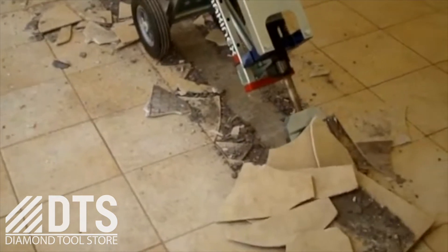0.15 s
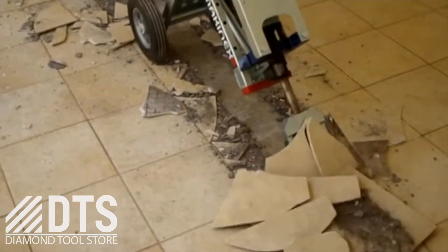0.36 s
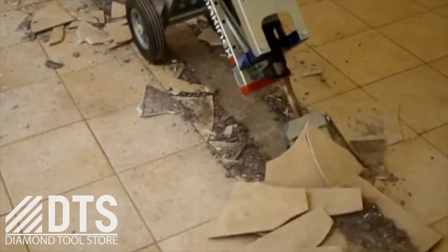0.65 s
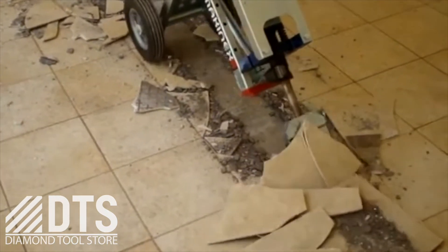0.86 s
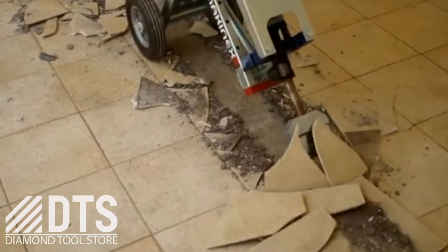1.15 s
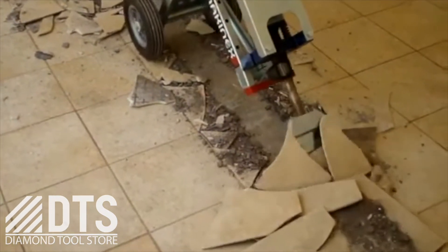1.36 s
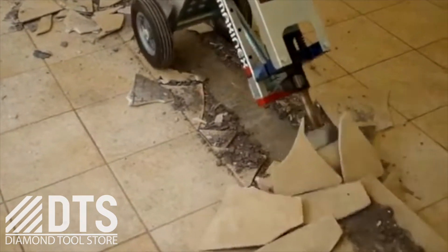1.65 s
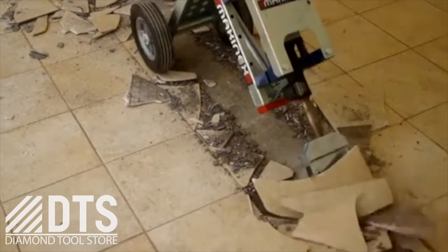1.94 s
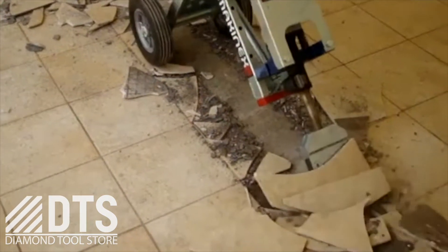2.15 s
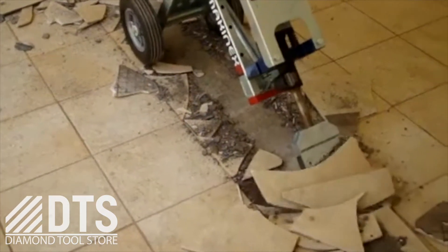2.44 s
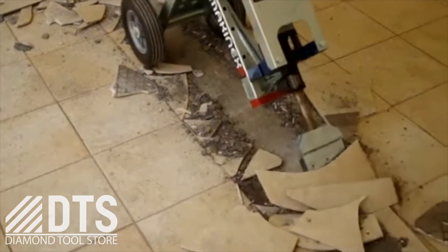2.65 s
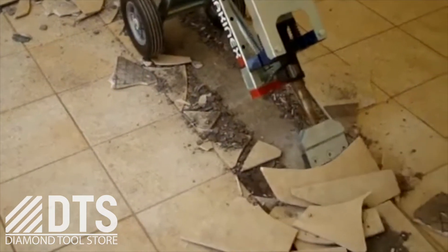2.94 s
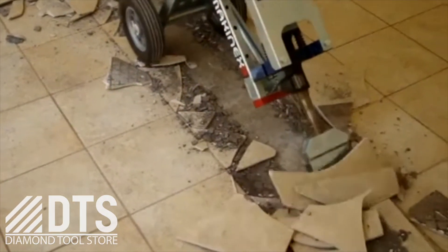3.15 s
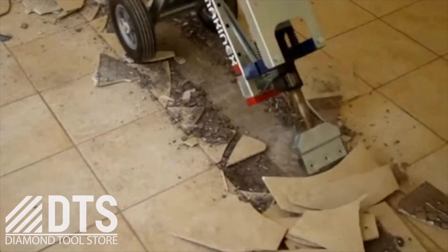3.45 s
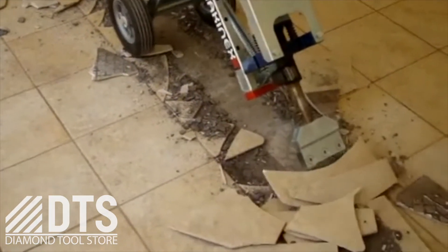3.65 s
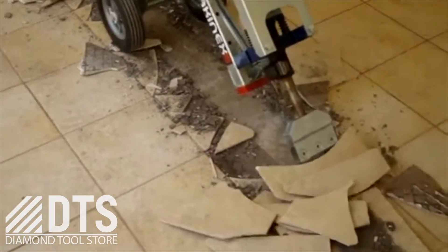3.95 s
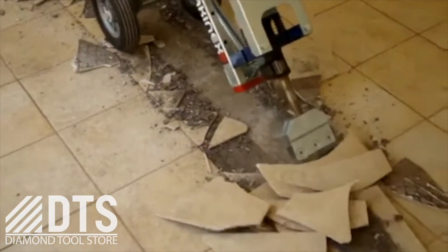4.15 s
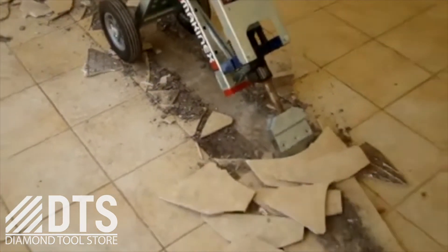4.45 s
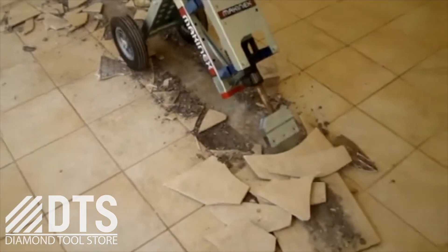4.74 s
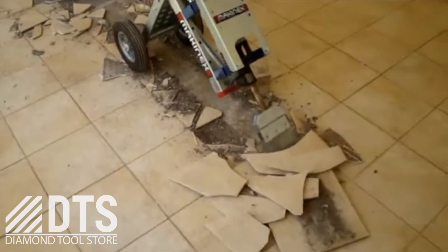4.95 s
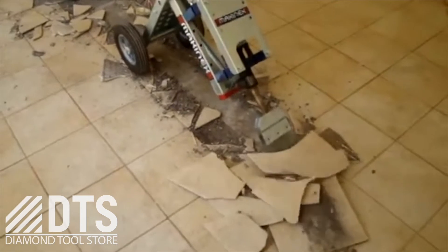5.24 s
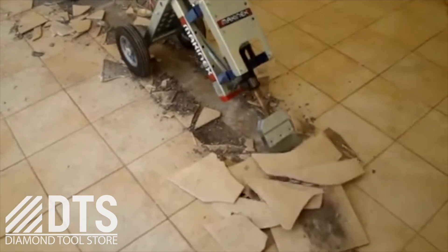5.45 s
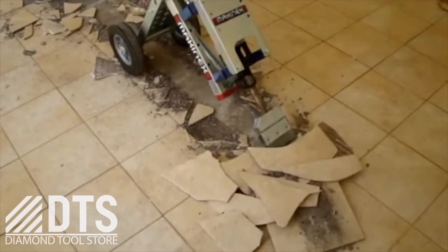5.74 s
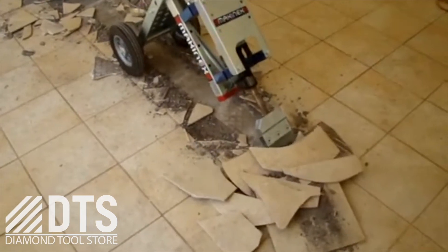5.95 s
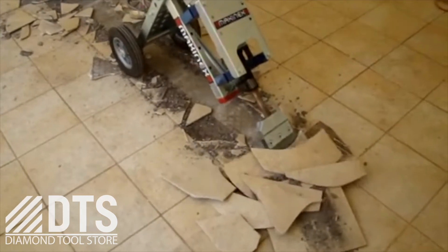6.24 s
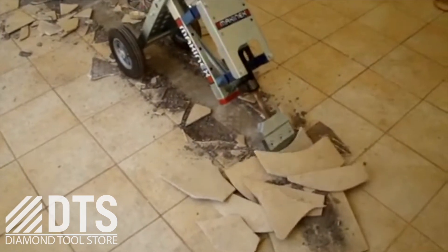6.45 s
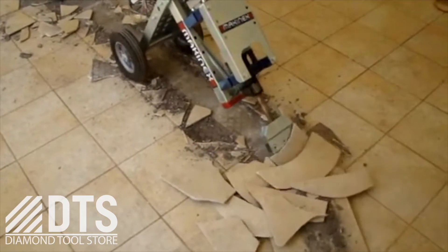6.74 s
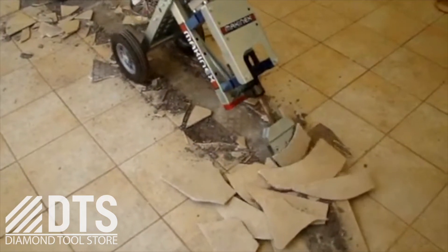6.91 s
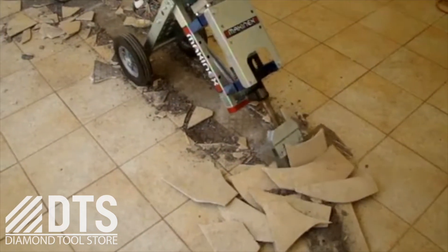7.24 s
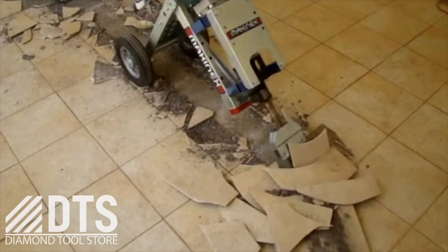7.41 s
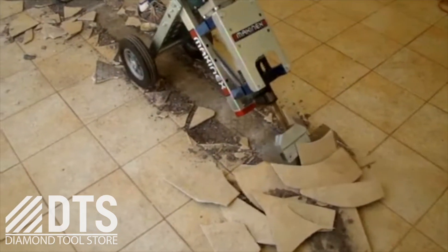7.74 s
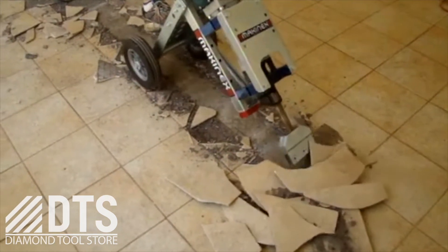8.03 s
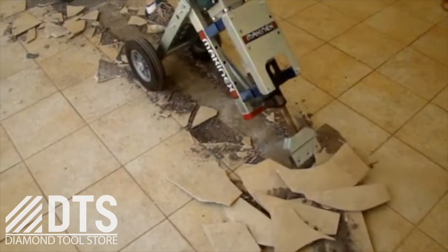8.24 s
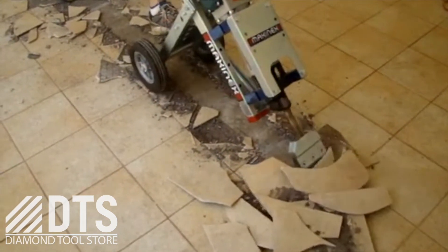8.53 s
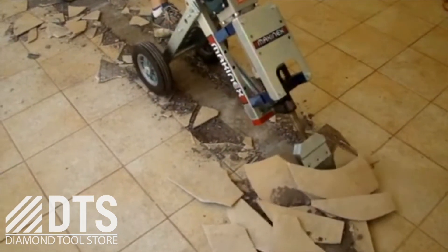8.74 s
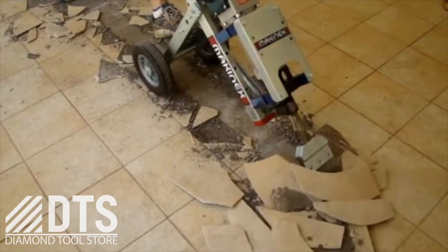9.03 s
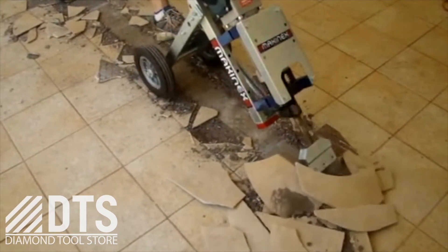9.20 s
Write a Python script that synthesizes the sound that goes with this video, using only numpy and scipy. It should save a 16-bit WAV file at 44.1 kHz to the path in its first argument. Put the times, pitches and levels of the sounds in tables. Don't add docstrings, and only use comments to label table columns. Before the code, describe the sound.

From 0 s an electric demolition hammer is already pounding at full speed, about 24 even blows a second, a harsh fluttering buzz that continues to the cut at about 9.4 s. Broken ceramic tiles clatter densely over it, with hissing grit and ringing steel. The blade skids near 0.8 s, then bites again; the rate sags slightly until 1.4 s. From 1.4 to 2.8 s pings and hollow tile rings crowd together, the hiss duller from about 2.2 s. Around 3 s the contact slackens briefly, then a hard push strengthens the hum from 3.3 to 3.9 s. At about 4.5 s the listening position steps back and the room hum changes colour. A strong bite comes near 4.8 s, sharp shard clacks scatter between 6.4 and 8.6 s, and skids and bites alternate near 9 s. The room is bare and echoing, the close microphone thin in bass, with faint handling rumbles.

```python
import sys
import numpy as np
from scipy import signal
from scipy.fft import rfft, irfft, next_fast_len
from scipy.io import wavfile
from scipy.ndimage import uniform_filter1d, map_coordinates

SR = 44100
rng = np.random.default_rng(int(sys.argv[2]) if len(sys.argv) > 2 else 0)


def amplitude_ratio(level_db):
    exponent = np.asarray(level_db, float) / 20
    return 10 ** exponent


def master_out(mix):
    frames = np.transpose(np.atleast_2d(mix))
    ceiling = np.clip(frames, -1, 1)
    pcm = np.round(ceiling * 32767).astype(np.int16)
    wavfile.write(sys.argv[1], SR, pcm)


N = 413216
TIME = np.arange(N) / SR


def unit(x):
    return x / np.sqrt(np.mean(x ** 2))


def colour(x, points):
    size = next_fast_len(len(x) + SR // 4)
    hz, db = np.transpose(points)
    bins_hz = np.arange(size // 2 + 1) * SR / size
    gain = amplitude_ratio(np.interp(np.log(bins_hz + 1), np.log(hz), db))
    return irfft(rfft(x, size) * gain, size)[:len(x)]


def highpass(x, hz):
    return signal.sosfilt(signal.butter(4, hz, "high", fs=SR, output="sos"), x)


def ring(x, modes):
    x = unit(x)
    out = x.copy()
    for hz, width, db in modes:
        out += amplitude_ratio(db) * unit(signal.lfilter(*signal.iirpeak(hz, hz / width, SR), x))
    return unit(out)


def walk(rate):
    k = int(SR / rate)
    held = np.repeat(rng.standard_normal(N // k + 1), k)
    return 1.14 * uniform_filter1d(uniform_filter1d(held, k), k)[:N]


def swell(s, rise_s, hold_s, fall_s):
    return np.clip(np.minimum((TIME - s) / rise_s + 1, 1 - (TIME - s - hold_s) / fall_s), 0, 1)


def diffuse(x, t60_s, wet_db):
    keep = amplitude_ratio(-120 / (t60_s * SR))
    power = signal.lfilter([1 - keep], [1, -keep], x ** 2, zi=[np.mean(x ** 2)])[0]
    return unit(x + amplitude_ratio(wet_db) * np.sqrt(power) * rng.standard_normal(N))


# time of the fullest skid in seconds, length in seconds, drive change in dB,
# change of contact with the slab in dB.
SKIDS = [(0.83, 0.21, 0.5, -8), (1.66, 0.17, -1, 0.5), (2.3, 0.14, 1, 3), (2.977, 0.2, -4, -8),
         (2.847, .2, 1.5, -6), (3.132, 0.2, 1, -4), (4.286, 0.16, -1.5, 0), (6.155, 0.073, -2.5, -3),
         (7.167, 0.085, -1.5, 1), (8.26, 0.23, -3, -2.5), (8.885, 0.054, -2.5, -3)]


def skids():
    drive = sum(db * swell(s, length / 2, 0, length / 2) for s, length, db, _ in SKIDS)
    recontact_s = .03
    lifted = sum(db * swell(s, length / 2, length / 3, recontact_s) for s, length, _, db in SKIDS)
    return drive, lifted


# time in seconds, gain in dB, hold in seconds.
BITES = [(0.08, 8.5, 0.054), (0.944, 6.5, 0.14), (1.796, 3.5, 0.25), (2.16, 7.5, 0.27), (3.242, 6, 0.45),
         (3.95, -2, .08), (4.404, 4, .03), (4.82, 8, 0.12), (6.35, 0.5, .15), (6.995, 4.5, 0.064),
         (7.65, 2.5, 0.18), (8.773, 4, .04), (8.966, 7, 0.044), (9.22, 4, .08)]


def bites():
    return np.max([db * swell(s, 0.11, hold, 0.21) for s, db, hold in BITES], axis=0)


# start in seconds, length in seconds, slab hum in dB.
PUSHES = [
    (-.2, 0.91, -73),
    (0.967, 0.34, -67),
    (1.42, .18, -82),
    (1.79, 1.1, -69.5),
    (3.07, 0.19, -76),
    (3.287, 0.64, -65.5),
    (4.02, .18, -79),
    (4.35, 0.97, -73),
    (5.505, 2.8, -71),
    (8.302, 1.3, -71),
]


def pushes():
    eased_db, lean_s, ease_s = -82, 0.034, 0.16
    return eased_db + np.max([(db - eased_db) * swell(s, lean_s, length, ease_s)
                              for s, length, db in PUSHES], axis=0)


# time in seconds, rattle in dB, large pieces over small ones in dB,
# grit thrown up in dB.
HEAP = [(0.0, -24, -6.5, -0.5), (0.21, -20.5, -7, -0.5), (1.04, -22.5, -7, -1), (1.51, -19.5, -8, 0),
        (1.85, -21.5, -7.5, -0.5), (2.14, -20, -7, -1.5), (3.08, -22.5, -6.5, -0.5),
        (3.31, -21.5, -9.5, -1), (3.39, -22, -5, -0.5), (4.28, -20.5, -10.5, -0.5), (4.7, -22.5, -9, 0),
        (5.19, -20, -9.5, -0.5), (6.08, -25, -8.5, 0), (6.78, -22.5, -10.5, 0), (8.87, -24, -9.5, 0),
        (9.0, -22.5, -10, 0), (9.32, -23, -7, 0), (9.37, -26, -9, -3)]
FLICKER_DB = 1.0, 0.3, 0.4, 0.2


def effort():
    skid, lifted = skids()
    bite, grip = bites(), pushes()
    s, rattle_db, size_db, dust_db = np.transpose(HEAP)
    rattle = np.interp(TIME, s, rattle_db) + 0.41 * skid
    size = np.interp(TIME, s, size_db)
    big = -1 + rattle + 0.15 * lifted + size + 0.11 * bite
    middle = -5.5 + rattle - 0.15 * size
    small = -9 + rattle - 0.51 * size
    grit = -23.5 + 0.12 * (rattle - np.mean(rattle)) + skid + np.interp(TIME, s, dust_db)
    layers = [db + spread * walk(14) for db, spread in zip((big, middle, small, grit), FLICKER_DB)]
    contact = -44 + bite + lifted + 0.54 * walk(16)
    hum = grip + 0.55 * lifted + .7 * walk(7.5)
    return amplitude_ratio(np.array(layers + [contact, hum]))


def handling():
    rumble = colour(rng.standard_normal(N), [(12, -14.0), (25, -5.5), (100, -6), (160, -24), (400, -66)])
    return amplitude_ratio(-78 + 2.2 * walk(8)) * unit(rumble)


# time in seconds, level in dB.
JOLTS = [(.15, -63), (.7, -69), (.8, -64), (1.59, -66), (2.04, -65), (2.32, -73), (2.71, -69), (3.05, -68),
         (3.4, -81), (4.15, -63), (4.93, -62), (5.95, -75), (7.3, -69), (8.17, -63)]


def jolts():
    shape = sum(amplitude_ratio(db) * swell(s, .02, .01, 0.072) for s, db in JOLTS)
    rumble = colour(rng.standard_normal(N), [(12, -10), (30, -7), (100, -1), (200, -3), (400, -61)])
    return shape * unit(rumble)


def echoes(pulses, t60_s, wet_db):
    length, at = SR // 3, np.flatnonzero(pulses)
    earlier = 7
    at = np.r_[at[0] - (at[1] - at[0]) * np.arange(earlier, 0, -1), at]
    fade = amplitude_ratio(-60 * np.arange(length) / SR / t60_s)
    likeness = .93
    out, tail = np.zeros(N + 2 * length), rng.standard_normal(length)
    for i in at:
        tail = likeness * tail + np.sqrt(1 - likeness ** 2) * rng.standard_normal(length)
        strength = pulses[i] if i >= at[earlier] else 1
        out[i + length:][:length] += strength * tail * fade
    return unit(pulses + amplitude_ratio(wet_db) * out[length:length + N] / np.linalg.norm(fade))


def chatter(turns, rate, spread_db, lag, settle, rest, rebound_db, t60_s, wet_db):
    first = np.exp(-((turns - lag) % 1) / settle)
    rebound = np.exp(-((turns - lag - .36) % 1) / settle)
    gate = rest + first + amplitude_ratio(rebound_db) * rebound
    hit = rng.random(N) < rate / SR
    size = amplitude_ratio(spread_db * np.minimum(rng.exponential(size=N), 4))
    return diffuse(gate * hit * rng.standard_normal(N) * size, t60_s, wet_db)


def blend(fresh, again, share):
    low = signal.butter(3, 2300, fs=SR, output="sos")
    return fresh + signal.sosfiltfilt(low, (np.sqrt(1 - share) - 1) * fresh + np.sqrt(share) * again)


def shifting(x, spread_db):
    f, frames, cells = signal.stft(x, SR, nperseg=512)
    where = np.meshgrid(f / 700, frames / .35, indexing="ij")
    patches = map_coordinates(rng.standard_normal((40, 40)), where, order=1)
    return signal.istft(cells * amplitude_ratio(spread_db * patches), SR, nperseg=512)[1][:N]


# frequency in Hz, width in Hz, level in dB.
STEEL = [(5136, 190, -16), (5440, 230, -26), (4690, 88, -22.5)]
# frequency in Hz, level in dB per Hz.
GRIT = [(2590, -43), (4400, -2.5), (5240, 0), (6230, -1.5), (7160, 0.5), (9490, -0.5), (10100, -3.5),
        (13100, -39), (22000, -120)]
# time in seconds, hold in seconds, share lost.
BURIED = [
    (.2, .25, 0.12),
    (2.245, 0.67, 0.28),
    (7.75, 0.35, 0.2),
]


def steel_and_grit(dust, level):
    hiss = shifting(colour(ring(dust, STEEL), GRIT), spread_db=-0.55)
    steel = amplitude_ratio(1.16 + 0.3 * walk(16)) * level * unit(hiss)
    cover = sum(lost * swell(s, 0.17, hold, 0.057) for s, hold, lost in BURIED)
    return steel - cover * colour(steel, [(6000, -39), (7000, -8), (7800, -4.5), (20000, -13)])


def singing(knocks, table, cycles, overhang):
    out = np.zeros(N)
    for s, length, hz, db in table:
        here = slice(max(int((s - overhang) * SR), 0), min(int((s + length + overhang) * SR), N))
        mode = signal.iirpeak(hz, cycles, SR)
        tone = unit(signal.lfilter(*mode, signal.lfilter(*mode, knocks[here])))
        out[here] += amplitude_ratio(db) * tone * np.sqrt(np.hanning(len(tone)))
    return out


# start in seconds, length in seconds, pitch in Hz, level in dB.
GLINTS = [(.25, 0.46, 5140, -30), (.55, .3, 8270, -30), (.5, 0.36, 7200, -34), (.6, 0.35, 9000, -31),
          (.95, .3, 5050, -28), (1.25, 0.33, 5400, -33), (1.5, .3, 5200, -33), (1.5, .6, 8250, -39),
          (1.9, .3, 6930, -38), (2.25, 0.45, 4690, -32), (2.45, 0.27, 5420, -39), (3.5, .4, 8350, -38),
          (3.6, 0.38, 6100, -42), (3.85, 0.28, 4690, -35), (3.9, .3, 8140, -39), (4.5, 0.44, 5270, -29),
          (4.652, .35, 9730, -32), (4.552, .55, 8310, -31), (5.95, 0.46, 9540, -32), (6.1, .3, 7060, -39),
          (6.2, 0.77, 5940, -30), (6.65, 0.32, 5000, -33), (6.8, .55, 8400, -34), (6.95, .3, 7200, -36),
          (7.3, 0.27, 4740, -33), (7.6, 0.31, 5130, -32), (7.95, .3, 7400, -38), (8.2, .35, 7050, -40),
          (8.2, 0.27, 8570, -41), (8.75, .4, 6260, -33), (8.85, .3, 9690, -36), (9.1, .27, 5200, -35)]


def glints(dust):
    return amplitude_ratio(-10.0) * singing(dust, GLINTS, cycles=7.5, overhang=0.068)


# start in seconds, length in seconds, pitch in Hz, level in dB.
RINGS = [(0.0, 0.52, 3180, -38), (0.0, 0.65, 1035, -32), (0.26, 0.31, 3600, -37), (0.91, 0.77, 1060, -31),
         (1.008, 0.96, 2510, -34), (1.173, 0.68, 3150, -32), (1.32, 0.46, 2000, -31),
         (1.865, 0.52, 993, -29.5), (1.95, 0.41, 1880, -34), (2.09, 0.5, 1260, -29),
         (2.19, 0.53, 2680, -30.5), (2.248, 0.52, 2200, -33), (2.29, 0.43, 3280, -35),
         (2.66, 0.32, 1017, -29.5), (3.054, 0.35, 1233, -33), (3.25, 0.58, 1060, -28),
         (3.83, 0.71, 1293, -30.5), (4.04, 0.27, 3400, -34), (4.125, 0.42, 1026, -29.5),
         (4.95, 0.68, 1020, -38), (4.818, 0.6, 1277, -30), (4.954, 0.37, 3440, -33),
         (5.76, 0.44, 1990, -32), (6.202, 0.43, 1860, -40), (7.34, 0.41, 4120, -36),
         (7.52, 0.38, 1940, -28), (7.56, 0.78, 1770, -32), (8.34, 0.77, 1890, -38), (6.65, 0.58, 3470, -35),
         (8.5, 0.65, 3960, -30), (.05, .3, 4180, -43), (1.3, .35, 3700, -37), (1.45, 0.37, 2310, -35),
         (1.9, 0.21, 2690, -37), (3.15, 0.31, 2410, -34), (3.35, .3, 4130, -41), (3.95, 0.35, 2454, -32),
         (5, 0.32, 3180, -32), (5.7, 0.37, 1177, -33), (5.75, 0.55, 3870, -37), (5.8, .3, 2410, -38),
         (5.9, 0.34, 1680, -33), (6.45, 0.39, 3920, -35), (7.4, 0.33, 985, -36), (8.45, .3, 1670, -32),
         (8.5, .4, 4280, -27), (8.6, .35, 3740, -32), (2.15, 0.39, 1163, -28), (6.6, .35, 2340, -40),
         (7.25, .3, 2190, -36)]


def leaning_tiles(loose):
    return amplitude_ratio(-5.5) * singing(loose, RINGS, cycles=14.8, overhang=0.06)


def single_knocks(table, t60_s, body_db, crack_db):
    length = 4410
    out, t = np.zeros(N + length), np.arange(length) / SR
    fade = amplitude_ratio(-60 * t / t60_s)
    for s, db, hz in table:
        crack = amplitude_ratio(crack_db) * rng.standard_normal(length)
        body = amplitude_ratio(body_db) * np.sin(2 * np.pi * hz * t)
        out[int(s * SR):][:length] += amplitude_ratio(db) * fade * (crack + body)
    return amplitude_ratio(-11.5) * colour(out[:N], [(400, -28), (1500, -2.0), (5000, 0.0), (10000, -25.5)])


# time in seconds, peak in dB, pitch in Hz.
CLACKS = [(0.1191, -20, 2150), (0.6913, -10, 2170), (2.2393, -1, 2600), (2.4124, -4, 2110),
          (2.7896, -7, 2220), (3.426, -2, 2410), (3.7808, -18, 4995), (4.0053, -4, 2470),
          (4.1704, -10, 3380), (4.432, -3, 2450), (5.069, 0, 3320), (5.539, -10, 2430), (6.6825, -1, 4700),
          (8.005, -0.5, 4240), (8.45, -7, 1900), (2.417, -3, 1175), (5.778, -4, 5205), (6.579, -4, 5147),
          (6.69, -3, 2250), (6.945, -6, 2276), (7.372, -1, 2104), (7.668, -5, 5100), (8.431, -8, 5100),
          (8.6, 0, 1360), (9.038, -1, 1946), (9.229, -5, 5147), (6.4328, -7, 5000), (6.4961, 0, 5240),
          (6.7456, -4, 5130), (8.0666, -5, 5080), (8.7844, -11, 3740), (9.1825, -6, 5020),
          (8.9075, -9, 3900)]


def clacks():
    return single_knocks(CLACKS, t60_s=0.17, body_db=-8.5, crack_db=-6.5)


# time in seconds, peak in dB, pitch in Hz.
PINGS = [(0.177, -7, 3210), (0.269, -1, 1310), (0.336, -4, 5200), (0.371, -5, 3640), (0.386, -6, 1060),
         (1.448, -4, 4631), (1.474, -5, 3195), (1.613, -1, 2449), (1.668, -11, 5205), (1.764, -7, 5130),
         (1.869, -5, 5147), (1.904, -6, 4171), (1.979, -5, 3253), (2.017, 0, 2660), (2.052, -5, 1980),
         (2.075, -5, 5147), (2.133, -5, 1243), (2.211, -3, 1243), (2.371, -7, 4688), (2.452, -1, 2736),
         (2.737, -7, 1013), (3.094, -6, 5147), (3.175, -7, 1300), (3.462, 0, 1071), (4.048, -8, 2449),
         (4.121, -3, 2470), (4.205, -9, 1030), (4.295, -6, 2400), (4.371, -6, 5147), (4.919, -2, 1250),
         (5.122, -3, 2430), (5.244, -6, 5837), (5.276, -3, 5147), (5.421, -8, 1020)]


def pings():
    return single_knocks(PINGS, t60_s=0.24, body_db=-7.0, crack_db=-14.0)


# frequency in Hz, width in Hz, level in dB.
TILE = [(1252, 40, -32.5), (1060, 900, -18.5)]
BLADE = [(2430, 130, -28.5), (2110, 110, -30.5), (1386, 40, -29), (1846, 67, -32.5)]
CHIPS = [(3183, 68, -28), (3390, 91, -24.5), (3600, 80, -27.5), (3854, 110, -25.5), (4160, 83, -26)]
# frequency in Hz, level in dB per Hz.
BIG = [(410, -25), (700, -10), (787, -5), (1020, -0.5), (1180, -2), (1600, -6), (2080, -37), (3520, -120)]
MIDDLE = [(880, -21.5), (1500, -3.5), (1900, 2), (2390, 1.5), (2900, -6), (3770, -23.5), (6380, -120)]
SMALL = [(1650, -43), (2800, -1.5), (3730, 1.5), (4500, -2), (5850, -51.5), (9900, -120)]


def heap(knocks, loose, big, middle, small):
    large_pieces = amplitude_ratio(-1.5) * big * unit(colour(ring(knocks, TILE), BIG))
    middle_pieces = amplitude_ratio(-0.92) * middle * unit(colour(ring(loose, BLADE), MIDDLE))
    small_pieces = amplitude_ratio(-1.22) * small * unit(colour(ring(loose, CHIPS), SMALL))
    return large_pieces + middle_pieces + small_pieces


# frequency in Hz, level in dB per Hz.
RUBBLE = [(65, -50), (110, -30.5), (140, -19.5), (242, -20), (318, -12.5), (474, -7), (588, 6), (800, -2),
          (1040, -13.5), (1760, -120)]


def rubble(knocks):
    return unit(colour(knocks, RUBBLE))


def drone(pulses, modes, width_hz, grip, wander_db):
    follow = 0.87
    eased = grip ** follow * amplitude_ratio(-71) ** (1 - follow)
    out = np.zeros(N)
    for hz, db in modes:
        mode = signal.iirpeak(hz, hz / width_hz, SR)
        drive = grip if hz == modes[0][0] else eased * amplitude_ratio(wander_db * walk(3.12))
        tone = unit(signal.lfilter(*mode, signal.lfilter(*mode, pulses)))
        out += drive * amplitude_ratio(db - modes[0][1]) * tone
    return out


# frequency in Hz, level in dB.
CLOSE_MODES = [(145.3, -67), (192, -72.5), (215.3, -69.5), (263.8, -71), (288, -61.5), (312.2, -59),
               (336, -60), (360.7, -56), (382.2, -59), (409.1, -56), (432, -59), (506.0, -56), (600, -51.5),
               (672.9, -50)]
BACK_MODES = [(145.3, -69), (193.8, -67.5), (290.7, -61), (312.2, -59), (339.1, -62), (387.6, -64),
              (411, -62), (436.0, -60.5), (508.5, -58.5), (581.4, -49.5), (605, -53), (653, -51),
              (750.5, -49.5), (869, -52)]


def room_modes(pulses, grip, back):
    close = drone(pulses, CLOSE_MODES, 19, grip, wander_db=2.5)
    distant = drone(pulses, BACK_MODES, 12.0, grip, wander_db=0.0)
    return amplitude_ratio(3.5) * (1 - back) * close + amplitude_ratio(-1.0) * back * distant


def thump(pulses, back):
    close_db, back_db = -78, -72
    felt = amplitude_ratio(close_db + (back_db - close_db) * back + 1.5 * walk(5) + 2.5 * walk(30))
    return felt * unit(colour(pulses, [(15, -10.0), (45, 3.5), (110, 7), (200, -16.5), (400, -67.0)]))


# frequency in Hz, level in dB.
SLAB = [(120, -59), (200, -41), (244, -29), (424, -5), (727, 9), (1090, -23), (1250, -12.5), (3110, -17),
        (4000, 4), (5200, -29), (8800, -120)]


def slab(again, back):
    return amplitude_ratio(1.5) * (0.5 + 0.53 * back) * unit(colour(again, SLAB))


# time in seconds, rate in Hz.
SPEED = [
    (0, 24.16),
    (.5, 24.1),
    (.8, 23.9),
    (1.4, 23.9),
    (1.7, 24.35),
    (2.1, 24.05),
    (3.9, 23.98),
    (4.3, 24.2),
    (6.5, 24.18),
    (9.37, 24.24),
]


def crank():
    return .97 + np.cumsum(np.interp(TIME, *np.transpose(SPEED))) / SR


def blows(turns, jitter_ms, scatter_db):
    at = np.flatnonzero(np.diff(np.floor(turns)) > 0)
    late, strength = rng.standard_normal((2, len(at)))
    at = np.clip(at + (jitter_ms * SR / 1000 * late).astype(int), 0, N - 1)
    pulses = np.zeros(N)
    pulses[at] = amplitude_ratio(scatter_db * strength)
    return pulses


def scene():
    turns = crank()
    big, middle, small, grit, contact, grip = effort()
    pulses = blows(turns, jitter_ms=0.0098, scatter_db=1.8)
    back = np.clip((TIME - 4.45) / 0.26, 0, 1)
    again = echoes(pulses, t60_s=0.46, wet_db=22.0)

    knocks = chatter(turns, 3000, spread_db=2.5, lag=0.85, settle=0.14, rest=0.9, rebound_db=1.0,
                     t60_s=0.8, wet_db=6.5)
    loose = chatter(turns, 4000, spread_db=2.5, lag=0.86, settle=0.09, rest=0.9, rebound_db=-2.5,
                    t60_s=0.6, wet_db=7.5)
    dust = chatter(turns, 9000, spread_db=3.0, lag=0.87, settle=0.1, rest=0.55, rebound_db=-8.0,
                   t60_s=0.98, wet_db=6.5)
    shuffle = amplitude_ratio(-0.5 - 1.8 * back) * rubble(knocks)

    knocks = blend(knocks, highpass(again, 450), .3)
    loose = blend(loose, again, .1 + (.33 - .1) * back)
    dust = blend(dust, again, .04)

    floor = room_modes(pulses, grip, back) + thump(pulses, back) + contact * (slab(again, back) + shuffle)
    air = heap(knocks, loose, big, middle, small) + steel_and_grit(dust, grit)
    air += leaning_tiles(loose) + glints(dust) + clacks() + pings()
    mono = floor + handling() + jolts() + highpass(air, 267)
    return np.array([mono, mono])


def patchy_treble(x, share, from_hz, depth_db, patchy_db):
    f, frames, cells = signal.stft(x, SR, nperseg=256)
    shape, patch = (44, len(frames) // 2 + 1), np.ones((3, 2))
    lost = np.kron(rng.random(shape), patch)[:len(f), :len(frames)]
    coarse = np.kron(rng.standard_normal(shape), patch)[:len(f), :len(frames)]
    treble = np.clip(f[:, None] / from_hz - 1, 0, 1)
    gain = amplitude_ratio(depth_db * (lost < share * treble) + patchy_db * treble * coarse)
    return signal.istft(cells * gain, SR, nperseg=256)[1][:N]


# time in seconds, low edge in Hz, high edge in Hz.
FILLS = [(1.35, 5100, 6400), (3.925, 4600, 5800), (3.97, 4600, 6400), (5.78, 8200, 9700),
         (6.15, 5700, 7000), (6.83, 5700, 8400), (7.03, 5100, 7000), (7.89, 6300, 7700), (8.68, 4600, 6400),
         (9.345, 5700, 7000), (9.345, 8200, 9700)]


def side_noise(x):
    side, frame = np.zeros(N), 2048
    for s, lo_hz, hi_hz in FILLS:
        band = signal.cheby2(12, 60, [lo_hz - 150, hi_hz + 150], "band", fs=SR, output="sos")
        here = slice(int(s * SR) - frame // 2, int(s * SR) + frame // 2)
        noise = unit(signal.sosfilt(band, rng.standard_normal(2 * frame))[frame:])
        level = amplitude_ratio(-5.0) * np.std(signal.sosfilt(band, x[here]))
        side[here] += level * np.sqrt(np.hanning(frame)) * noise
    return side


def roll_off(x):
    return signal.sosfilt(signal.butter(12, 11140, fs=SR, output="sos"), x)


def record(dry):
    squash = np.tanh(dry[0]) - dry[0]
    x = dry[0] + signal.sosfiltfilt(signal.butter(4, 500, "high", fs=SR, output="sos"), squash)
    x = patchy_treble(amplitude_ratio(0.68) * x, share=0.16, from_hz=3300, depth_db=-43.0, patchy_db=-1.0)
    x = signal.sosfilt(signal.ellip(16, .3, 90, 10060, fs=SR, output="sos"), x)
    mix = x + side_noise(x) * np.array([[1], [-1]])
    return roll_off(mix)


dry = scene()
out = record(dry)
master_out(out)
```